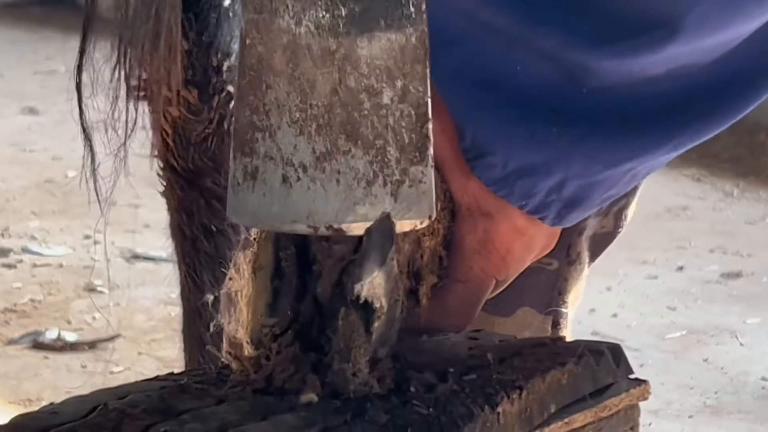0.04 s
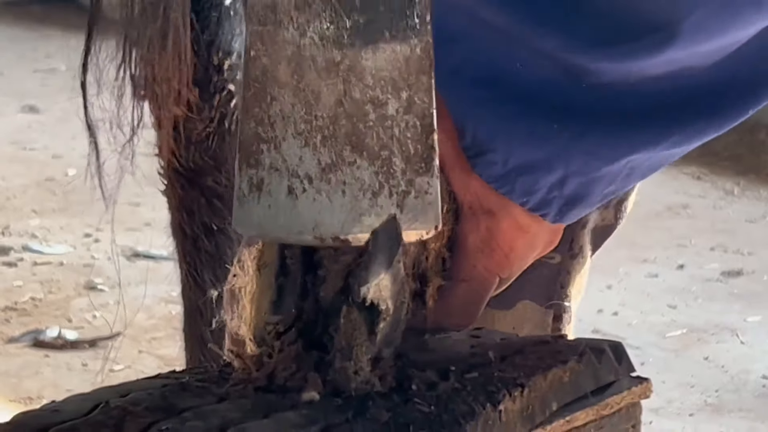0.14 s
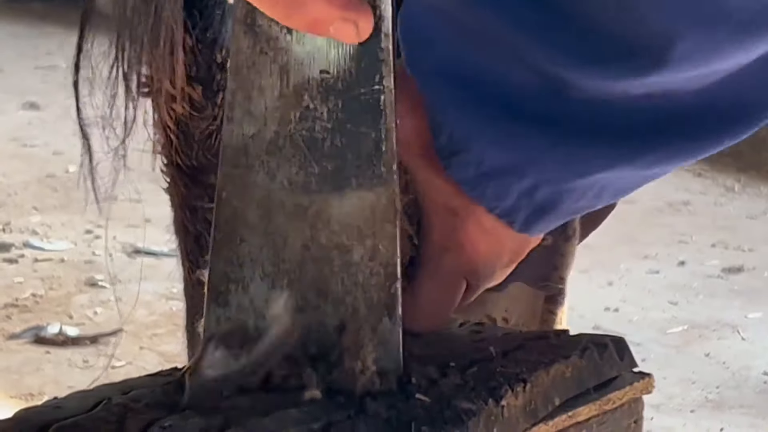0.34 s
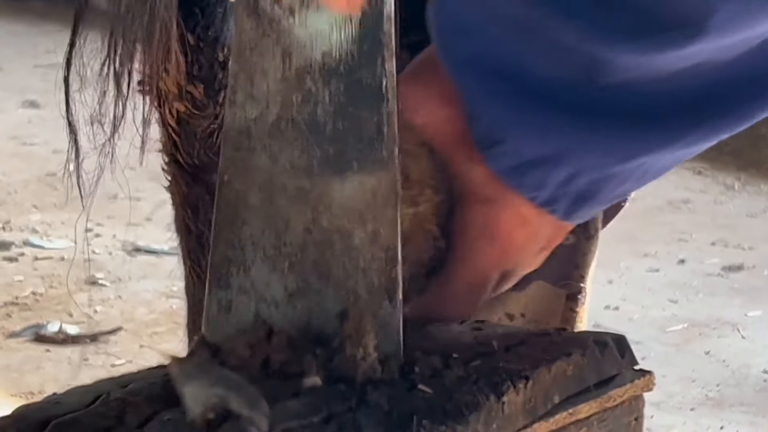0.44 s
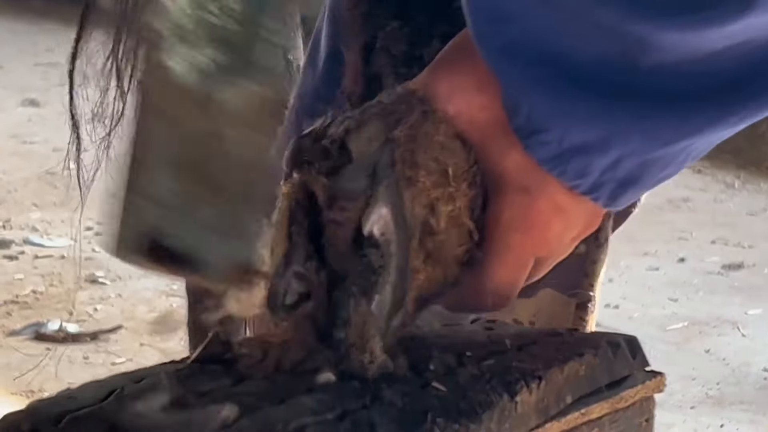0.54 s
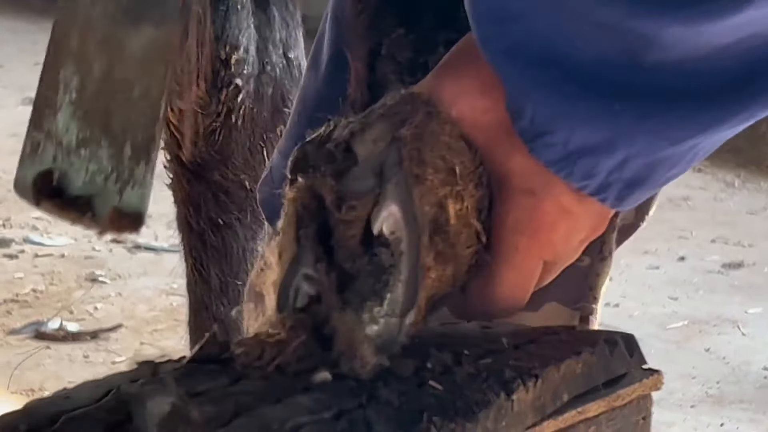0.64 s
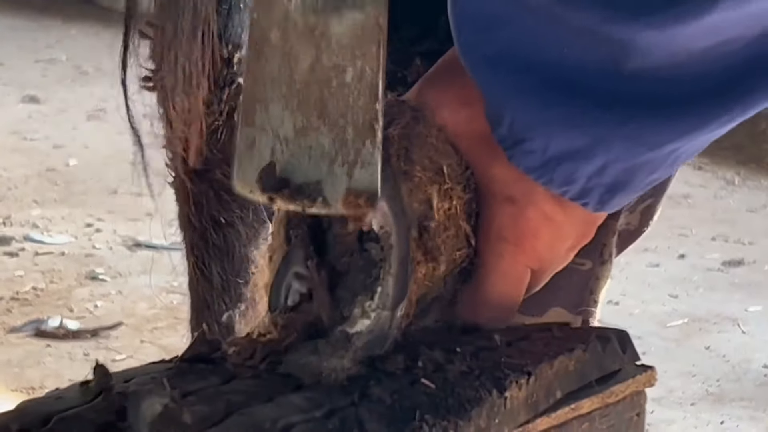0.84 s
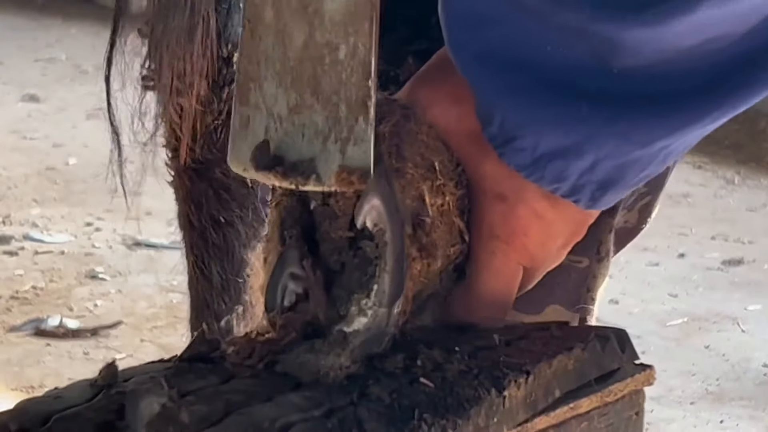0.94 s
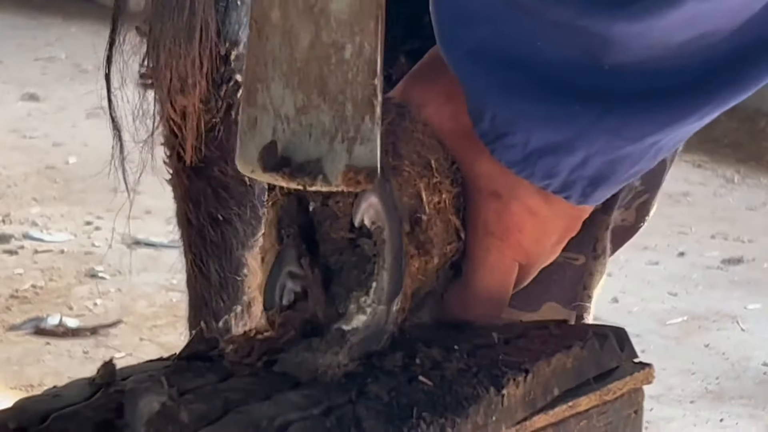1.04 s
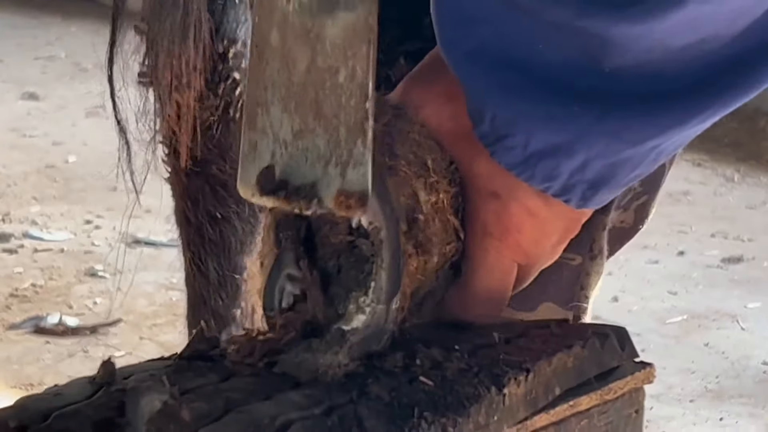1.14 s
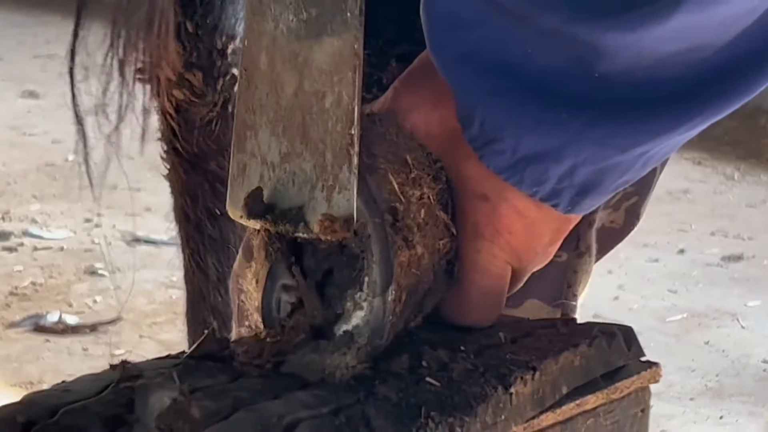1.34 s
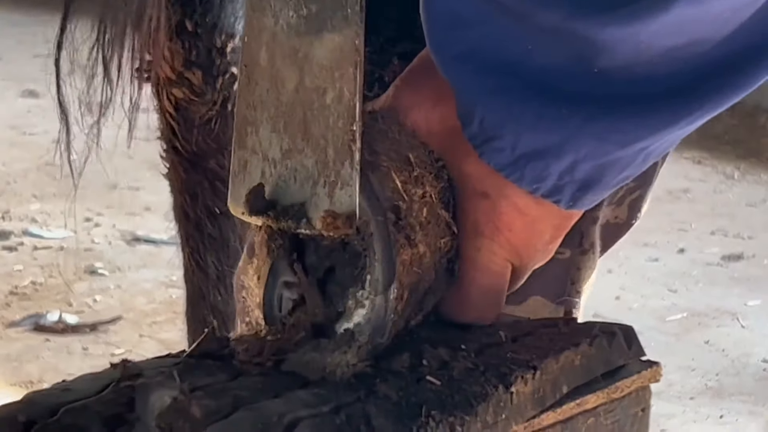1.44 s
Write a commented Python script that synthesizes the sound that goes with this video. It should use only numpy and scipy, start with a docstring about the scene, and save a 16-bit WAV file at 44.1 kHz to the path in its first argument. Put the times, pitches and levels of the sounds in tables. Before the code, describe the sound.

A hoof chop: a short, faint gritty rasp from 0.1 seconds leads to a sharp crack and solid woody slam at 0.21, dying quickly. Hoof and blade then shift on the block with soft rustling, tiny grit ticks and dull knock clusters near 0.5, 0.65 and 0.88. Quiet outdoor air, low distant engine throb and faint bird notes continue, with a clearer chirp near 1.48.

```python
"""Hoof horn cut on a wooden block

Outdoors, a flat blade is pushed down through hoof horn. It rasps (dense random grains), breaks through
(a burst of noise) and slams onto a wooden block (clicks that ring the block's modes).
Afterwards hoof and blade shift on the block with knocks (short damped cycles), ticks and a noise rustle.
Birds call in gliding notes, faint bands of hiss come and go, and a distant engine throbs in one low
resonance under the outdoor air, which is flickering noise."""
import sys
import numpy as np
from scipy import signal
from scipy.io import wavfile

SR = 44100
rng = np.random.default_rng(int(sys.argv[2]) if len(sys.argv) > 2 else 0)


def wav_record(signal):
    """Record a signal, one row per channel, as 16-bit PCM in the file named by sys.argv[1]."""
    frames = np.transpose(np.atleast_2d(signal))
    bounded = np.clip(frames, -1, 1)
    # unit amplitude maps onto the largest positive 16-bit level
    quanta = np.round(bounded * 32767).astype(np.int16)
    wavfile.write(sys.argv[1], SR, quanta)


N = 66150  # samples in the scene, 1.5 s

# Ways the block rings with hoof and blade on it: f/Hz, level/dB, time to fall by 60 dB/s
BLOCK_MODES = [(86, -15, 0.14), (115.7, -14.5, .07), (250, 1, 0.077), (600, -5, 0.027), (690, -6.5, 0.029),
               (906, -20, 0.017), (1180, -4.5, 0.038), (1410, -10.5, 0.018), (1948, -9, 0.048),
               (2300, -11, 0.015), (2550, -21, 0.008), (2560, -20, 0.033), (3100, -20.5, .03),
               (3450, -7, 0.0095)]
# Contacts of the blade landing on the block: t/s, level/dB, lowest f/Hz, highest f/Hz excited
CONTACTS = [(.2080, -17.5, 990, 4600), (0.2091, -11, 790, 3532), (.2109, -7, 510, 3000),
            (.2120, -8.5, 345, 1178), (.2126, -8.5, 163, 483), (0.217, -10.5, 52.5, 169),
            (.2165, -25, 1514, 4500), (.2270, -26.5, 600, 3500)]
CONTACT_SPREAD_DB = 0.5  # chance in how hard each contact strikes each mode
# Stereo spread of the sounds at the block: f/Hz, side minus mid level/dB
BLOCK_WIDTH = [(60, -26), (110, -24), (200, -28.5), (380, -3), (700, -14), (1290, -1.5), (2380, -13),
               (4400, -21), (8120, -1.5), (15000, -2)]
MODE_SIDE_DB = -7.5  # modes lean less than the crack spreads

# Noise of the break-through: f/Hz, relative level per Hz/dB
CRACK_COLOUR = [(180, -33), (300, -6.5), (667, -9.5), (1720, -11), (1970, -11), (4750, -17), (5160, -22.5),
                (6960, -24), (9710, -40.5), (14500, -31.5), (16000, -65)]
# How fast that noise dies: f/Hz, time to fall by 60 dB/s
CRACK_T60 = [(300, 0.09), (1500, 0.065), (5000, 0.042), (9000, 0.083), (15000, .05)]
CRACK_S, CRACK_DB, CRACK_RISE_S = .2074, -16.5, 0.0011
SETTLE_DB, SETTLE_T60_S = -33.5, 0.74  # slower tail, level relative to the crack

# Rasp of the edge in the horn: t/s, level/dB
RASP_LEVEL = [(.09, -67.5), (.124, -55.5), (.131, -46.5), (.146, -43.5), (.156, -55.5), (.172, -51.5),
              (.19, -44), (.194, -34.5), (.204, -38.5), (.212, -39)]
# Tone colour of the rasp: f/Hz, relative level per Hz/dB
RASP_COLOUR = [(400, -28), (700, -11), (1400, -12), (2100, -1), (3200, -4), (4600, -11), (6700, -10.5),
               (8600, -19.5), (10000, -31.5), (11500, -16), (13500, -8), (16000, -24)]
RASP_GRAINS_PER_S = 12000

# Dull knocks as hoof and blade shift: t/s, level/dB, pitch f/Hz, length of ring/cycles
KNOCKS = [(.494, -40.5, 752, 8.6), (.530, -38.5, 287, 2.4), (.531, -40.5, 650, 3.5), (.534, -37, 250, 3.6),
          (.636, -34.5, 510, 2.7), (.636, -38, 900, 1.8), (.643, -42.5, 1927, 5.2), (.647, -33.5, 700, 1.7),
          (.653, -34, 314, 1.6), (0.656, -42.5, 131, 4.7), (.660, -41, 444, 5.6), (.667, -38, 193, 1),
          (.676, -47, 470, 2), (.783, -43.5, 710, 5.3), (.812, -80, 297, 2.3), (.862, -45, 790, 6.4),
          (.863, -39, 425, 2.7), (.872, -42.5, 600, 1.34), (.877, -32.5, 332, 2.26), (0.879, -53, 2380, 12),
          (.883, -46, 580, 2.7), (.887, -46.5, 805, 3.5), (.888, -43, 344, 7.3), (.893, -45, 390, 3.4),
          (1.157, -53, 453, 7.3)]
# Shuffling on the block: t/s, level/dB
RUSTLE_LEVEL = [(.2, -82), (.25, -48.5), (.34, -61), (.47, -57.5), (.56, -56), (.66, -56), (.71, -67.5),
                (.76, -66), (.85, -57), (.885, -53.5), (.93, -60), (1.0, -67.5), (1.1, -68), (1.5, -78)]
# Tone colour of the shuffling: f/Hz, relative level per Hz/dB
RUSTLE_COLOUR = [(150, -38), (250, -0.5), (629, -6), (906, -11.5), (4900, -21.5), (8550, -32),
                 (10000, -77.5), (11100, -38.5), (14400, -30.5), (16000, -50)]
# Ticks of grit under the blade: t/s, level/dB, lowest f/Hz, length/s (loudest halfway)
TICKS = [(0.412, -52.5, 1440, 0.0044), (0.4508, -47, 3740, 0.00067), (0.528, -48, 1000, 0.0042),
         (0.778, -58.5, 1800, 0.011), (0.888, -56, 2000, 0.0019), (1.155, -64, 1480, 0.0039)]
TICK_TOP_HZ = 5200

# Bird notes: start t/s, length/s, level/dB, start f/Hz, end f/Hz, breath to each side f/Hz
BIRDS = [(0.314, 0.011, -68, 4900, 5000, 72), (0.334, .025, -67, 4830, 5113, 100),
         (0.484, 0.03, -65.5, 5200, 6000, 480), (.543, 0.03, -60, 5100, 4700, 86),
         (1.008, 0.14, -67.5, 4700, 4990, 400), (1.115, 0.06, -63, 5320, 6500, 120),
         (1.144, 0.058, -63, 6380, 5910, 650), (1.191, 0.082, -71.5, 5960, 5600, 780),
         (1.285, 0.0564, -74, 3346, 3410, 217), (1.473, 0.013, -46.5, 2660, 3340, 11),
         (1.484, 0.022, -45.5, 3636, 3643, 17.5), (1.486, .04, -60, 2870, 3100, 160)]
# Faint narrow bands of hiss: start t/s, length/s, level/dB, start f/Hz, end f/Hz, spread to each side f/Hz
HISSES = [(.255, 0.056, -51.5, 1685, 1650, 60), (.25, 0.081, -51.5, 600, 519, 114),
          (.54, 0.15, -55, 692, 701.3, 116), (.58, 0.17, -66.5, 3450, 3450, 197),
          (.80, 0.429, -69.5, 1654, 1597, 114), (.83, .14, -71.5, 6160, 6610, 600),
          (1.28, 0.21, -72.5, 1628, 1637, 152)]

# Slow rise and fall of the distant engine: t/s, level/dB
RUMBLE_LEVEL = [(0, -41), (.1, -52), (.3, -49.5), (.5, -53), (.63, -47), (.78, -44.5), (.84, -57),
                (.9, -48.5), (1.03, -49), (1.11, -58.5), (1.17, -45.5), (1.3, -58), (1.45, -47)]
RUMBLE_HZ, RUMBLE_WIDTH_HZ = 64.2, 16
THROB_PER_S, THROB_FIRST_S = 14.6, -.012  # firings counted on from this time
THROB_SPREAD_DB, THROB_NOISE_DB = 3, -7  # unevenness of firings; noise relative to firings

# Tone colour of the outdoor air: f/Hz, relative level per Hz/dB
AIR_COLOUR = [(15, -30), (25, 7), (141, -1), (256, -13), (363, -23.5), (451, -39.5), (624, -32), (962, -25),
              (1650, -31.5), (3340, -35), (4870, -41.5), (6380, -41.5), (9840, -61), (13600, -39.5),
              (16000, -56.5)]
# Stereo spread of air and rustle: f/Hz, side minus mid level/dB
WIDTH = [(60, -18.5), (110, -22.5), (200, -12), (380, -6), (700, -9), (1290, -2), (2380, -12),
         (4400, -32.5), (8120, 8), (15000, -3)]
AIR_DB = -48.5

MIC_LOW_HZ, TOP_STOP_HZ = 38.27, 16300  # bass cut corner; top is 70 dB down from here up


def amp(db):
    """Turn decibels into a plain multiplier."""
    return 10 ** (np.asarray(db, float) / 20)


def unit(x):
    """Scale a sound to an average (RMS) strength of 1."""
    return x / np.sqrt(np.mean(x ** 2) + 1e-20)


def at_hz(points, hz):
    """Read a frequency table between its rows, along a musical (log) scale."""
    p = np.array(points, float)
    return np.interp(np.log(hz), np.log(p[:, 0]), p[:, 1])


def level(rows, outside_db=None):
    """Loudness over time, as a multiplier, from rows of t/s, level/dB."""
    s, db = np.transpose(rows)
    return amp(np.interp(np.arange(N) / SR, s, db, outside_db, outside_db))


def drift(rate_hz):
    """Slow random wandering of spread 1: smoothed noise made at every 40th sample."""
    r = np.exp(-2 * np.pi * rate_hz * 40 / SR)
    noise = rng.standard_normal(N // 40 + 2002)
    slow = signal.lfilter([1], [1, -2 * r, r * r], noise)[2000:]  # skip the filter's start
    return np.interp(np.arange(N) / 40, np.arange(len(slow)), unit(slow))


def band(x, low_hz, high_hz):
    """Keep only the part of a sound between two frequencies."""
    top_hz = min(max(high_hz, 1.2 * low_hz), .45 * SR)
    return signal.sosfilt(signal.butter(2, [low_hz, top_hz], "band", fs=SR, output="sos"), x)


def white():
    """Two independent pairs of even hiss, each pair a mid and a side."""
    return rng.standard_normal((2, 2, N))


def coloured(source, spectrum, width, patchy_db=0., shape=lambda hz: 1):
    """Split noise into third-octave bands, each with its level, flicker, stereo width and envelope."""
    out, norm = 0, 0
    edges = 25 * 2 ** (np.arange(29) / 3)
    for k, (low, high) in enumerate(zip(edges, edges[1:])):
        hz = np.sqrt(low * high)
        if hz < spectrum[0][0]:
            continue
        mid, side = band(source[k % 2], low, high)  # neighbouring bands use different noise
        gain = amp(at_hz(spectrum, hz))
        norm += gain ** 2 * np.mean(mid ** 2)
        flicker = amp(patchy_db * drift(7.9))
        stereo = mid + amp(at_hz(width, hz)) * side * [[1], [-1]]
        out = out + gain * flicker * shape(hz) * stereo
    return out / np.sqrt(norm)


def block():
    """Each contact is a band-limited click that rings all the block's modes, each a little to one side."""
    out = np.zeros((2, N))
    luck = rng.standard_normal((len(CONTACTS), len(BLOCK_MODES)))
    pushes = []
    for s, db, low, high in CONTACTS:
        click = amp(db) * (np.arange(N) == int(s * SR)) + 1e-18
        pushes.append(band(click, low, high))
    for k, (hz, mode_db, t60) in enumerate(BLOCK_MODES):
        r = amp(-60 / (t60 * SR))  # loss per sample
        w = 2 * np.pi * hz / SR
        push = amp(mode_db + CONTACT_SPREAD_DB * luck[:, k]) @ np.array(pushes)
        rung = signal.lfilter([0, np.sin(w)], [1, -2 * r * np.cos(w), r * r], push)
        lean = (-1) ** k * amp(MODE_SIDE_DB + at_hz(BLOCK_WIDTH, hz))  # modes take sides in turn
        out += rung * (1 + lean * np.array([[1], [-1]]))
    return out


def crack():
    """The break-through: a noise burst that dies at its own speed in each band, over a slower tail."""
    t = np.maximum(np.arange(N) / SR - CRACK_S, 0)
    rise = 1 - np.exp(-t / CRACK_RISE_S)
    tail = amp(SETTLE_DB - 60 * t / SETTLE_T60_S)

    def shape(hz):
        return rise * (amp(-60 * t / at_hz(CRACK_T60, hz)) + tail)

    return amp(CRACK_DB) * coloured(white(), CRACK_COLOUR, BLOCK_WIDTH, shape=shape)


def rasp():
    """Tearing horn makes dense grains of uneven size at random times."""
    sizes = amp(2.2 * rng.exponential(1, (2, 2, N))) * rng.choice([-1, 1], (2, 2, N))
    grains = sizes * (rng.random((2, 2, N)) < RASP_GRAINS_PER_S / SR)
    return level(RASP_LEVEL, -120) * coloured(grains, RASP_COLOUR, BLOCK_WIDTH, patchy_db=2.0)


def knocks():
    """Hoof and blade shifting: a few damped cycles that swell in softly."""
    out, t = np.zeros(N), np.arange(N) / SR
    for (s, db, hz, cycles), turn in zip(KNOCKS, rng.random(len(KNOCKS))):
        u = np.maximum(t - s, 0) * hz  # cycles since the start
        swell = 5 * u / cycles  # loudest a fifth of the way through
        out += amp(db) * swell * np.exp(1 - swell) * np.sin(2 * np.pi * (u + turn))
    return out


def rustle():
    """Shuffling on the block: coloured noise that rises and falls."""
    return level(RUSTLE_LEVEL) * coloured(white(), RUSTLE_COLOUR, WIDTH, patchy_db=0.5)


def ticks():
    """Grit under the blade: short bright puffs of noise that swell and fade."""
    out, t = np.zeros(N), np.arange(N) / SR
    for s, db, low, length in TICKS:
        u = np.maximum(t - s, 0) / length * 2
        puff = unit(band(rng.standard_normal(N), low, TICK_TOP_HZ))
        out += amp(db) * puff * u * np.exp(1 - u)
    return out


def notes(table):
    """Bird notes or hisses: gliding tones, from near-pure to a breathy band, under a smooth swell."""
    out, t = np.zeros(N), np.arange(N) / SR
    for s, length, db, start_hz, end_hz, width_hz in table:
        u = np.clip((t - s) / length, 0, 1)
        a, b = signal.lfilter(*signal.butter(2, width_hz, fs=SR), rng.standard_normal((2, N)))
        breath = np.clip(width_hz / 120, 0, 1)  # 0 is a pure tone, 1 is all noise
        phase = 2 * np.pi * np.cumsum(start_hz + (end_hz - start_hz) * u) / SR
        note = (1 - breath + breath * unit(a)) * np.sin(phase) + breath * unit(b) * np.cos(phase)
        swell = np.sqrt(np.abs(np.sin(np.pi * u))) * (u < 1)
        out += amp(db) * swell * note
    return out


def rumble():
    """A far engine: uneven firings and noise, both heard through one low resonance."""
    k = np.arange(1, 22)
    at = ((THROB_FIRST_S + k / THROB_PER_S) * SR).astype(int)
    inside = at < N
    strengths = amp(THROB_SPREAD_DB * rng.standard_normal(len(k)))
    firings = np.full(N, 1e-18)
    firings[at[inside]] = strengths[inside]

    def ring(x):
        return unit(band(x, RUMBLE_HZ - RUMBLE_WIDTH_HZ / 2, RUMBLE_HZ + RUMBLE_WIDTH_HZ / 2))

    throb = ring(firings) + amp(THROB_NOISE_DB) * ring(rng.standard_normal(N))
    return level(RUMBLE_LEVEL) * unit(throb)


def air():
    """Outdoor background: steady coloured noise whose bands flicker."""
    return amp(AIR_DB) * coloured(white(), AIR_COLOUR, WIDTH, patchy_db=2.5)


def scene():
    """Add up all the sounds, from the blade's landing to the background."""
    cut = block() + crack() + rasp()
    shifting = knocks() + rustle() + ticks()
    background = notes(BIRDS) + notes(HISSES) + rumble() + air()
    return cut + shifting + background


def record(dry):
    """The microphone loses the deepest bass; the top is cut."""
    x = signal.sosfilt(signal.butter(3, MIC_LOW_HZ, "high", fs=SR, output="sos"), dry)
    return signal.sosfilt(signal.cheby2(12, 70, TOP_STOP_HZ, fs=SR, output="sos"), x)


dry = scene()
out = record(dry)
wav_record(out)
```